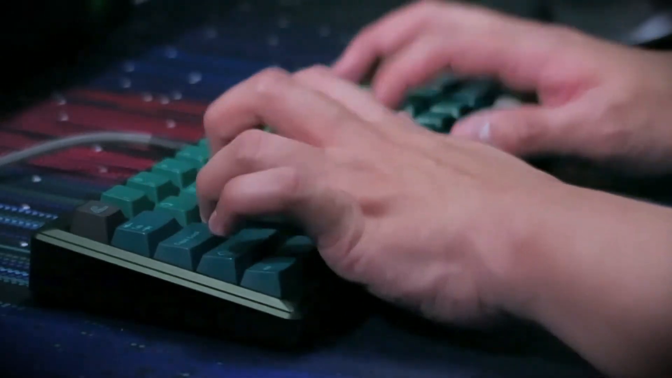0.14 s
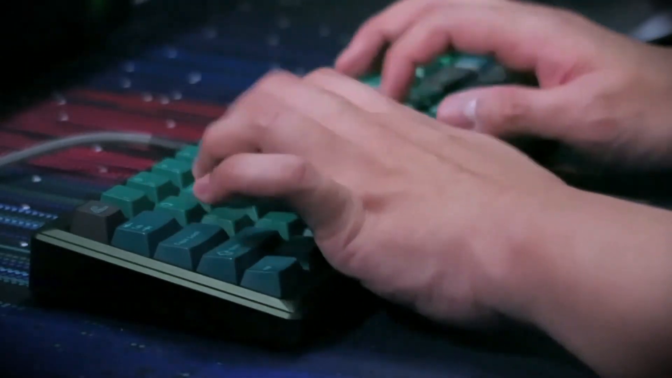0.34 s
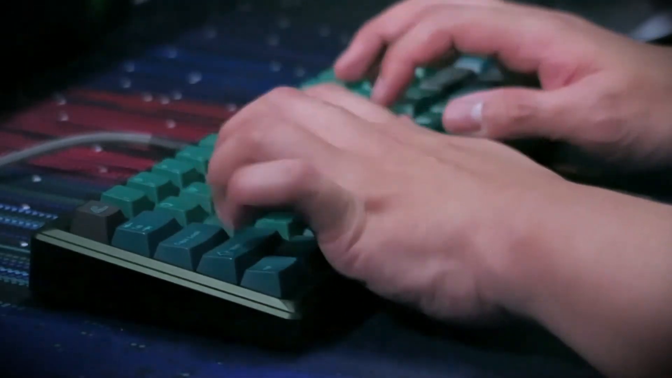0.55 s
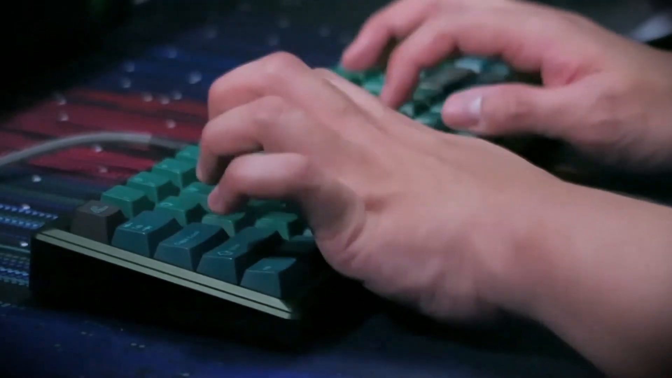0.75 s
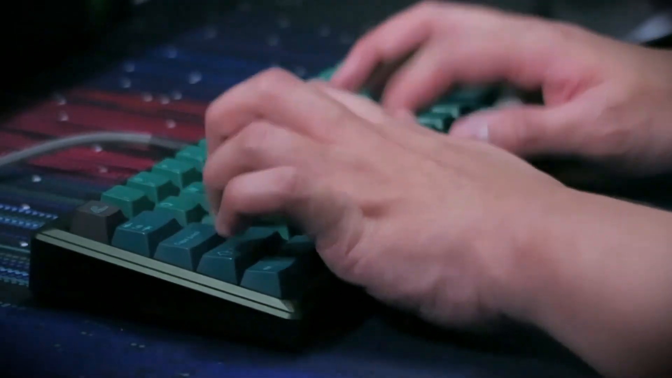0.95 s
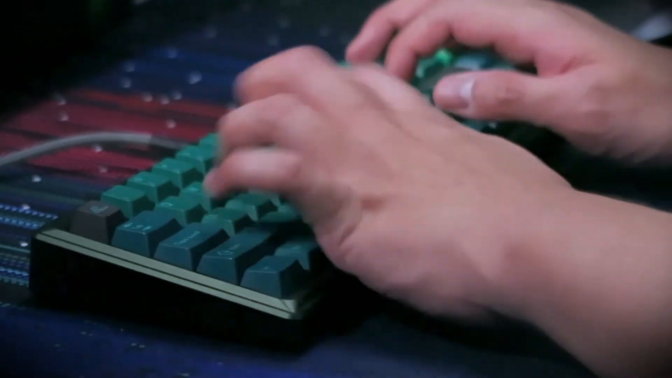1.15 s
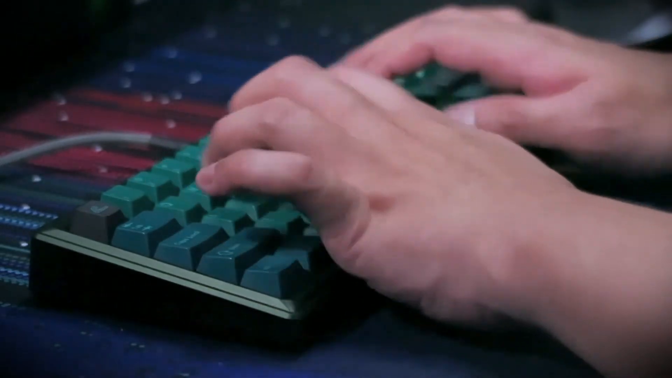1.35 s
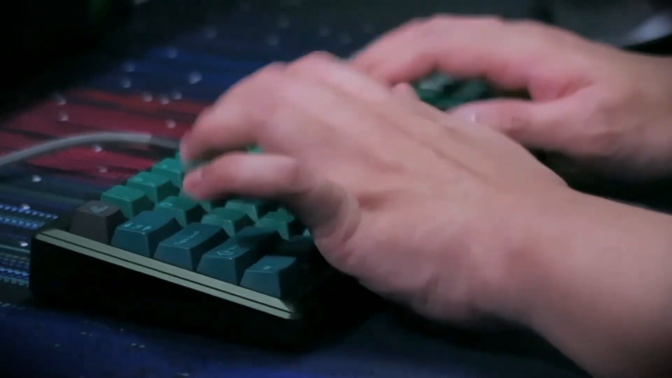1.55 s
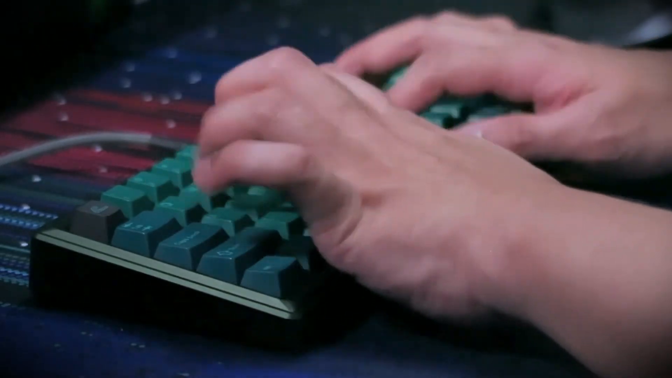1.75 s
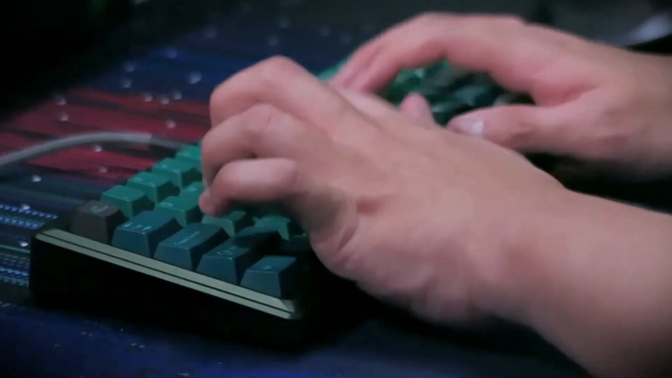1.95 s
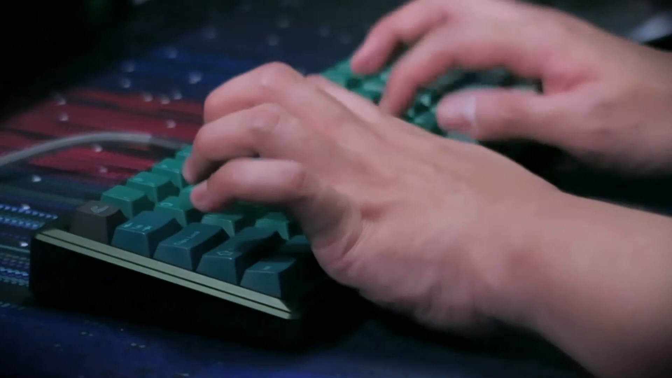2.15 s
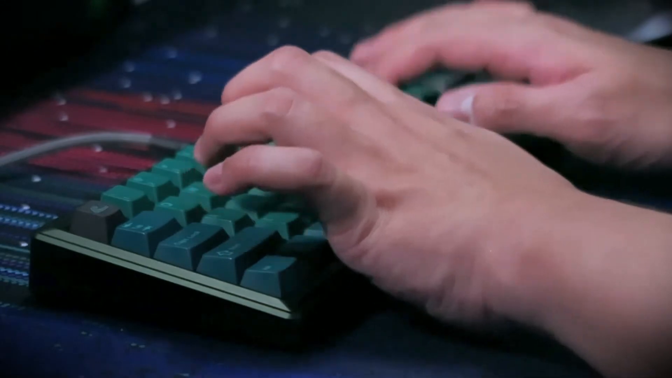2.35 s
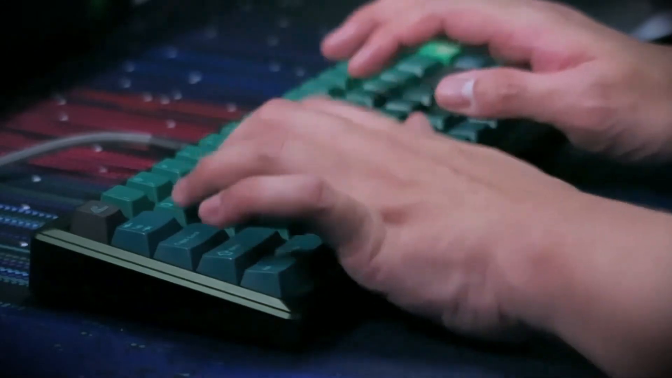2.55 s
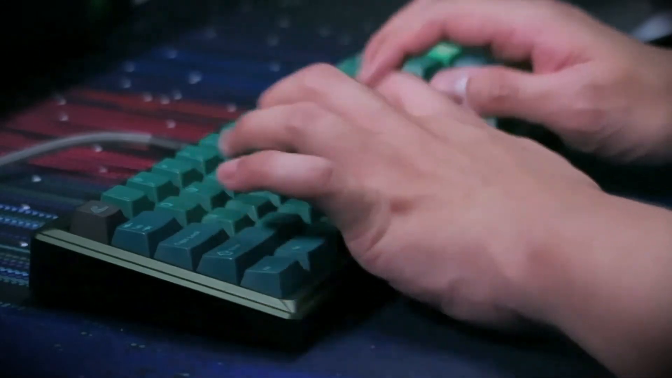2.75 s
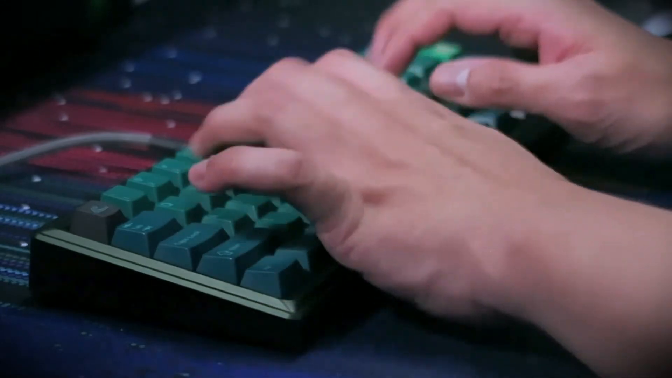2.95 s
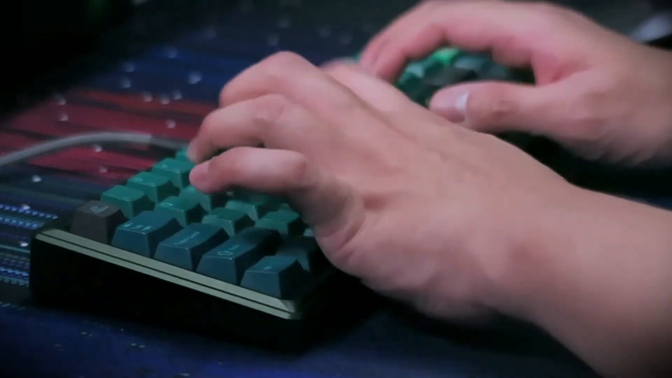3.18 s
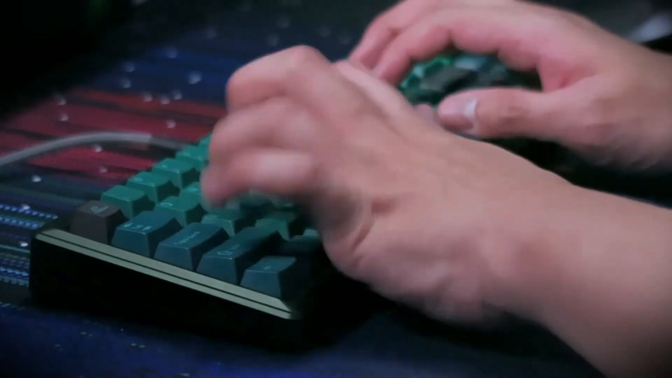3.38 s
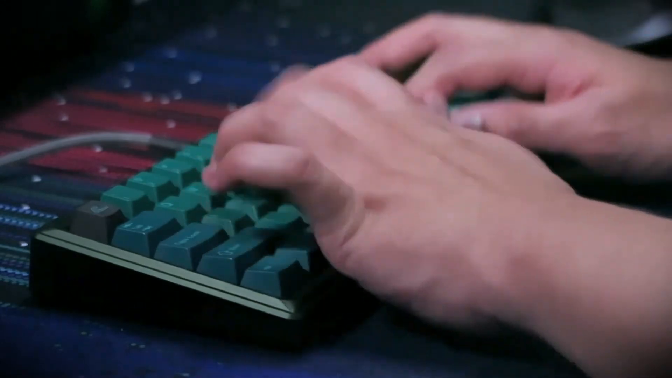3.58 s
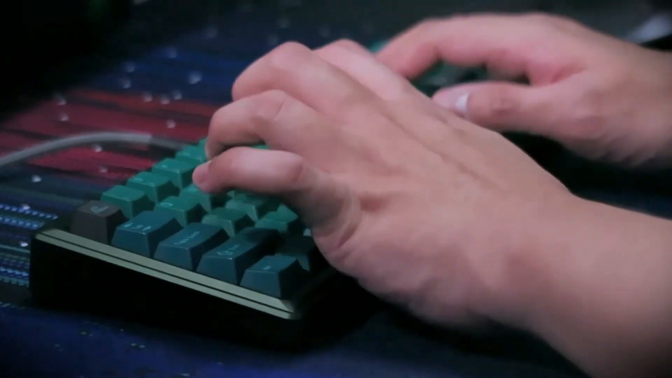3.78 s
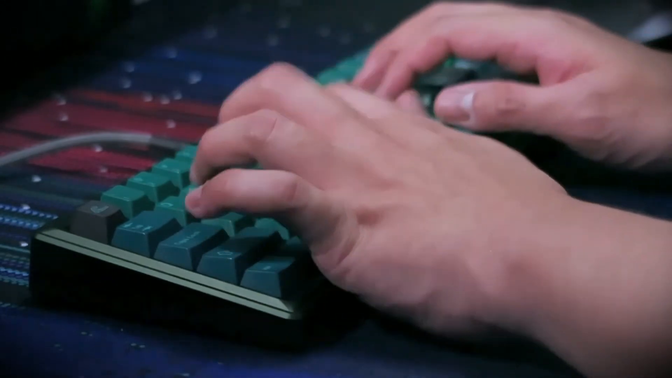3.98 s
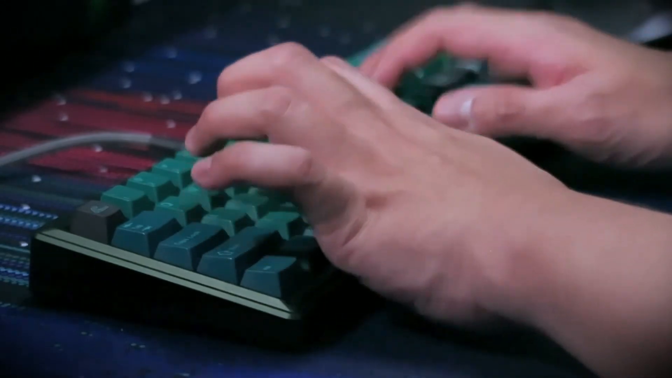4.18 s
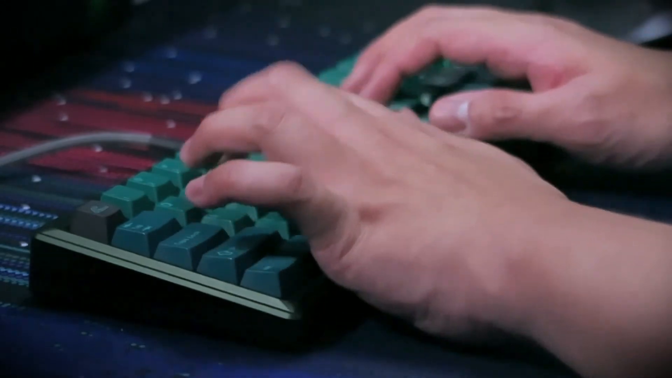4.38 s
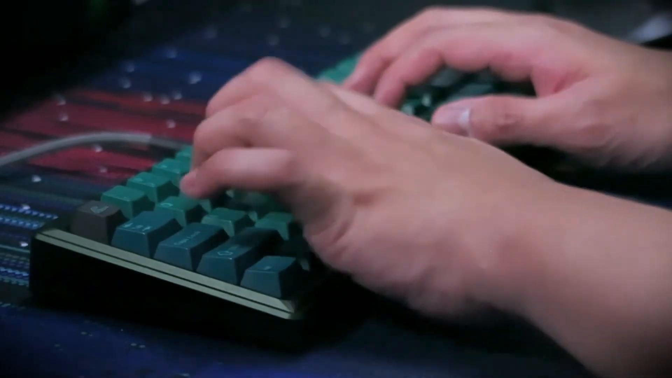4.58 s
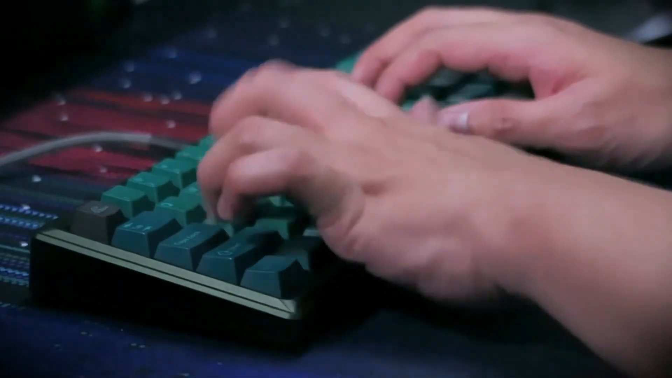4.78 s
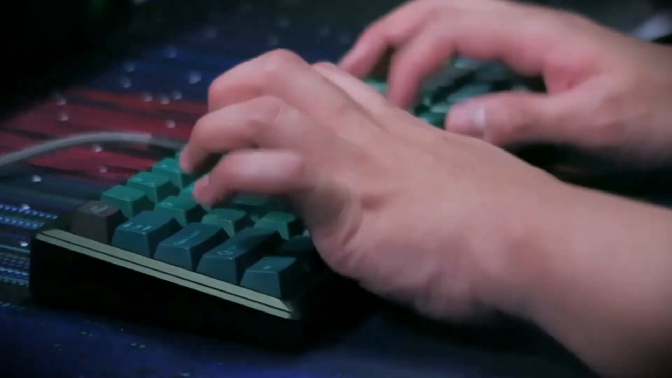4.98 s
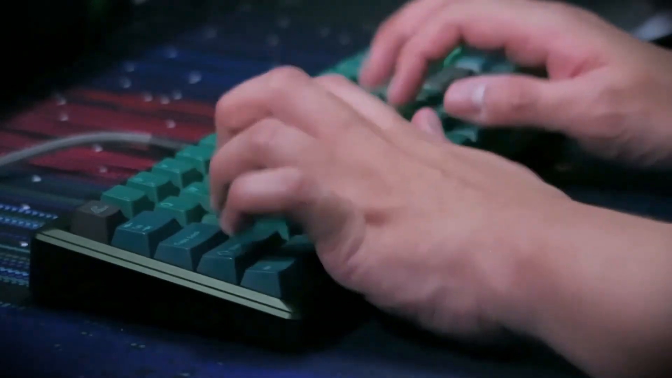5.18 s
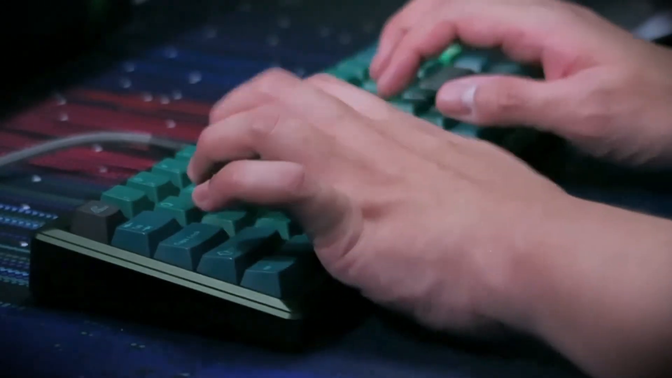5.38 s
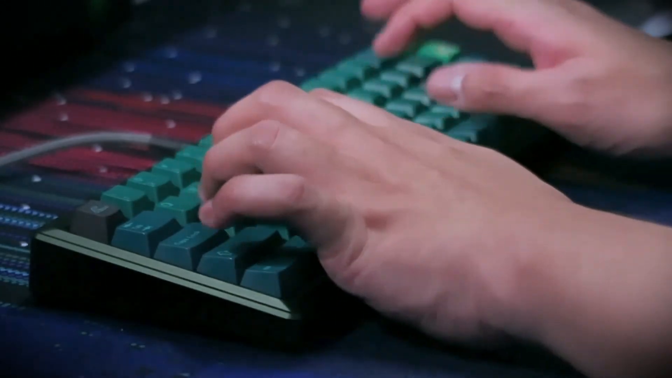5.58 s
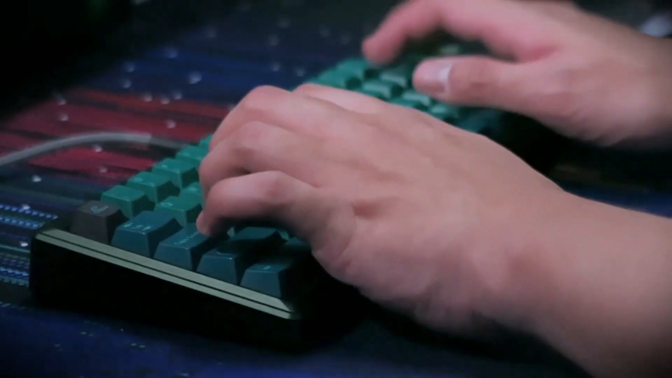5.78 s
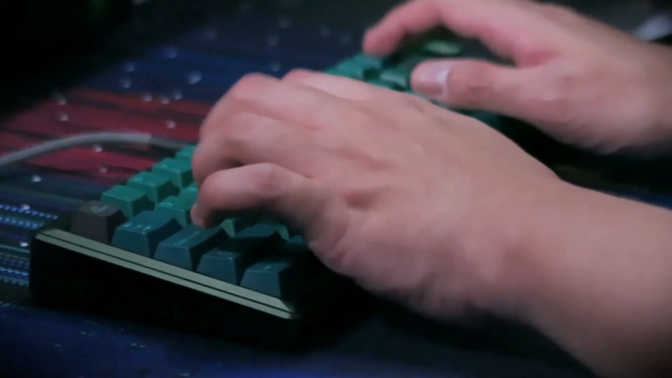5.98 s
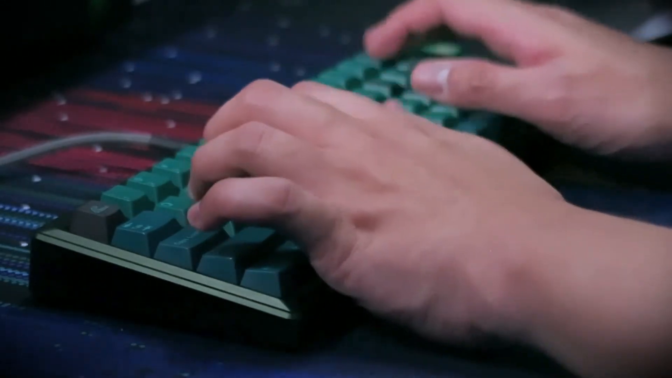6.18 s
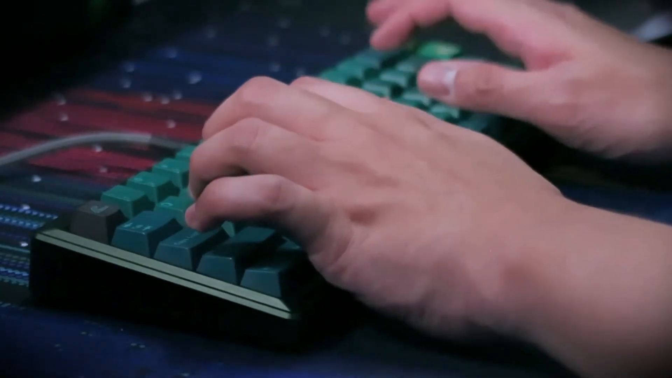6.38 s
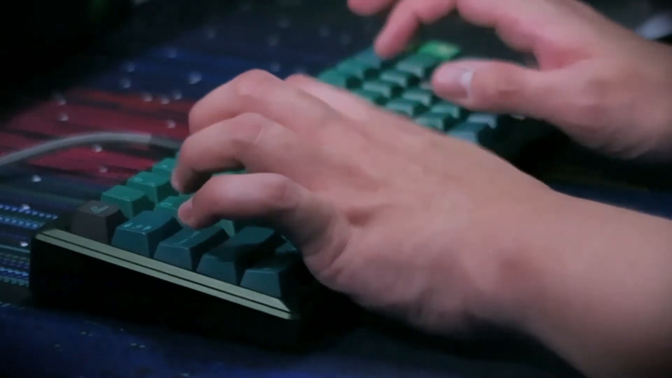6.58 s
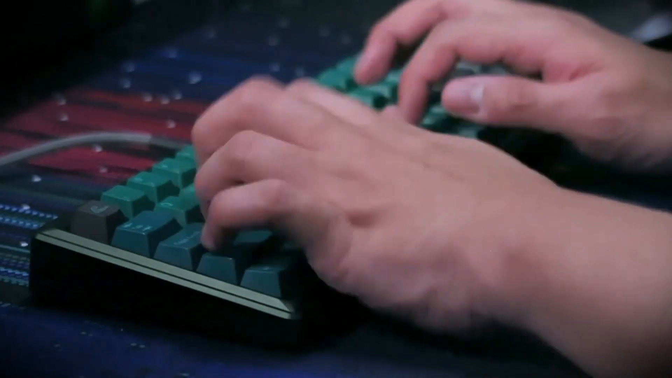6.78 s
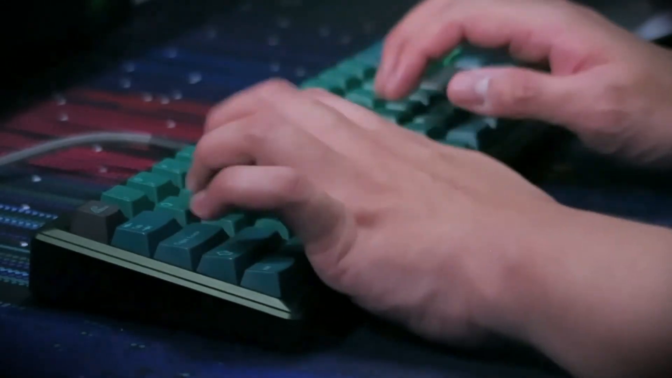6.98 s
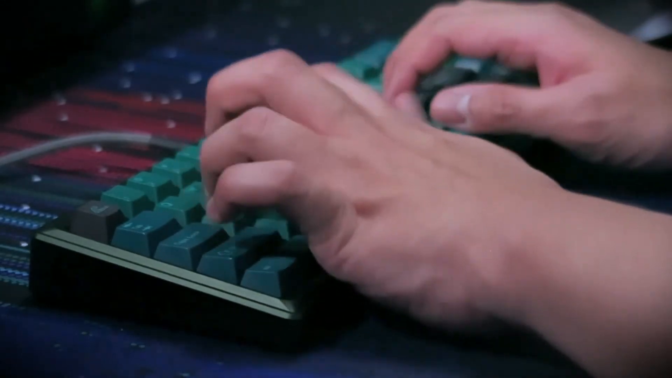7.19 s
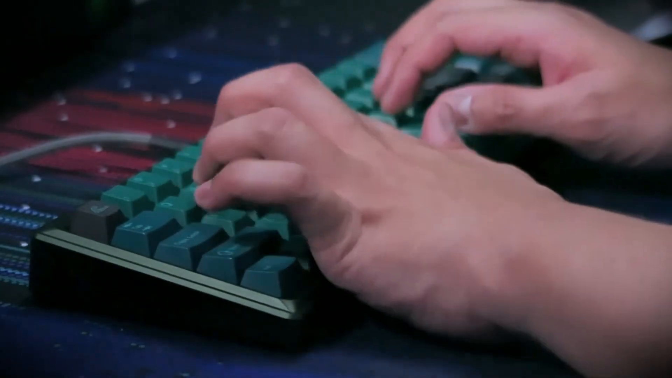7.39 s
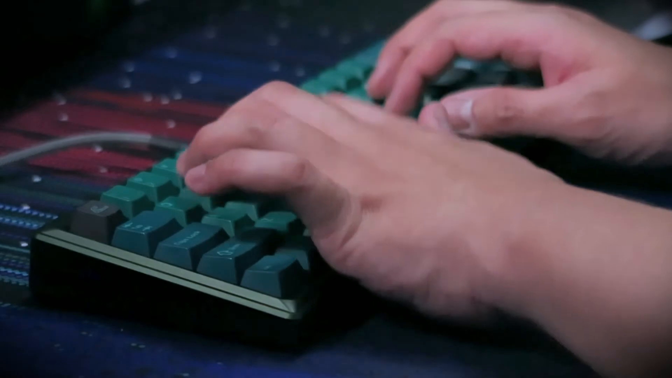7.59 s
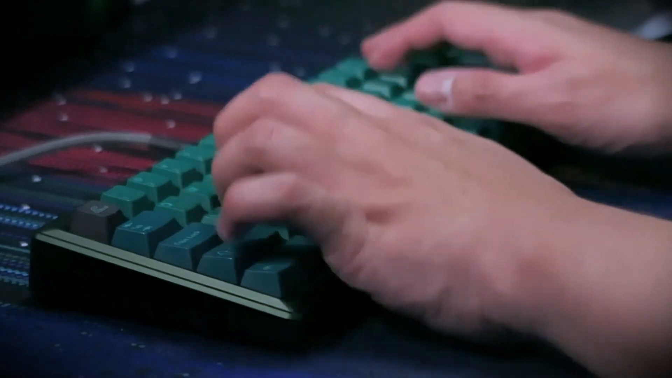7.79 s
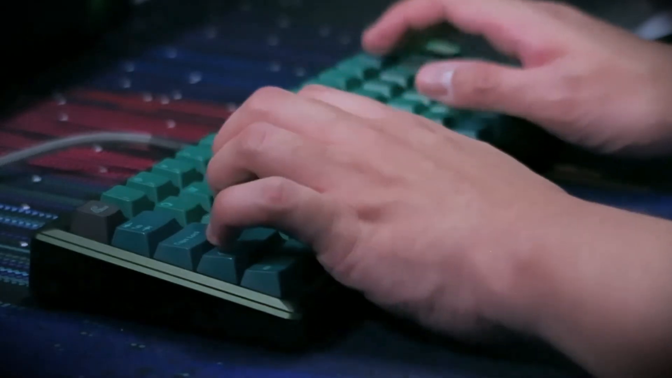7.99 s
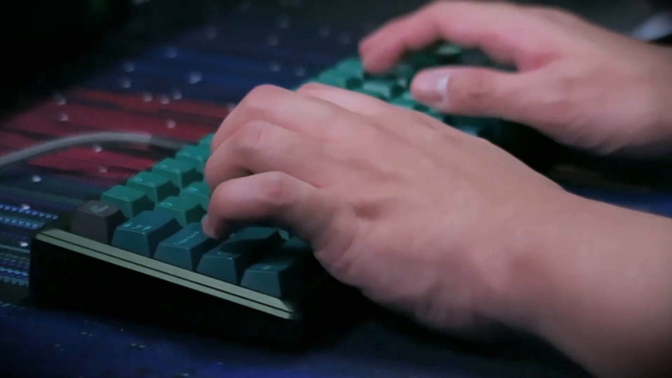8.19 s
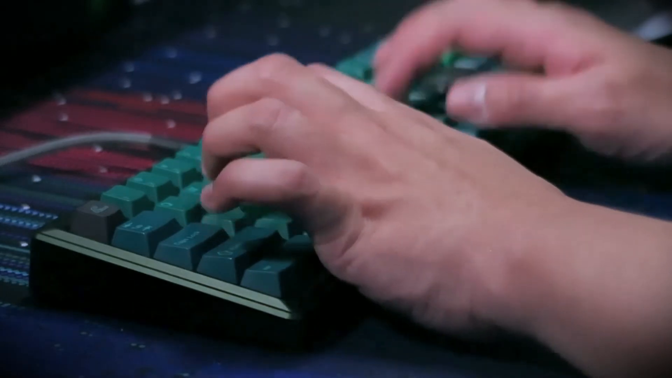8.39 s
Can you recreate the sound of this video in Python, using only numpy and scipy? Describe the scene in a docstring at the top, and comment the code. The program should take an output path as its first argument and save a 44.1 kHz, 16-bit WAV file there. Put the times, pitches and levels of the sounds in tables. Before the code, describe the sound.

Fingers type fast on a small mechanical keyboard close by, crisp clacks and hollow space-bar knocks over a faint low hum and soft room air.

```python
"""Quiet room air rushes softly throughout while two small motors hum and beat.
Over it fingers type fast on a small mechanical keyboard on a desk, close by: each key knocks as it lands or
springs back, ringing cap, plate and case after a slide that grows with force; desk and room answer briefly.
Near 1 s a low, wavering tone swells far off; later come knocks with a wide key's ring, most with a softer
knock on springing back, and near 8 s a hand brushes the desk. Knocks are noisy pushes through decaying sines."""
import sys
import numpy as np
from scipy import signal
from scipy.io import wavfile
from scipy.ndimage import uniform_filter1d

SR = 44100
rng = np.random.default_rng(int(sys.argv[2]) if len(sys.argv) > 2 else 0)


def field_ratio(decibels):
    """Amplitude ratio for a level in dB (20 dB per decade); scalars and array-likes work."""
    return 10 ** (np.asarray(decibels, dtype=float) / 20)


def wav_out(sig):
    """Save sig, one row per channel (or a flat mono array), as 16-bit PCM at SR to the path in sys.argv[1]."""
    wavfile.write(sys.argv[1], SR, np.round(np.clip(np.atleast_2d(sig).T, -1, 1) * 32767).astype(np.int16))


N = 372204
SPAN = 900  # samples of one push or ring
PLAIN_CLACK_HZ = 2620  # colour at which the clack modes stand unshifted
LETTER_BODY_DB = -22.5  # hollow body of letter and wide keys, re clack

# middle ring of a letter key, before key-to-key scatter: pitch_hz, level_db (relative), t60_s
CLACK = [(2185, -0.5, 0.009), (2530, 6, 0.0059), (3100, 0.5, 0.0083)]
# bright ring of a key, before key-to-key scatter: pitch_hz, level_db (relative), t60_s
SNAP = [(4967, -2, 0.0021), (6620, -3, 0.0012), (8580, 4.5, 0.0008), (10610, 2.5, 0.0025),
        (14500, -4, 0.002)]


def band(low_hz, high_hz, order=4):
    """Band-pass, as second-order sections."""
    return signal.butter(order, [low_hz, high_hz], "band", fs=SR, output="sos")


# the bands in which the parts of a key radiate
CLACK_BAND, SNAP_BAND = band(1702, 6600), band(3147, 13500)
BODY_BAND, WIDE_BAND = band(1000, 1469), band(1043, 7240, order=6)


def evened(x):
    """Scale to an rms of 1."""
    return x / np.sqrt(np.mean(x ** 2) + 1e-20)


def read_curve(points, hz):
    """Read a (frequency, value) curve along a log frequency axis."""
    point_hz, value = np.transpose(points)
    return np.interp(np.log(hz + 1), np.log(point_hz + 1), value)


def add(mix, start_s, sound):
    """Lay a sound into the mix, cut at the end."""
    part = mix[round(start_s * SR):][:len(sound)]
    part += sound[:len(part)]


def air():
    """Low rush of the room: shaped noise, slightly lumpy in time and frequency."""
    # spectrum of the rush: pitch_hz, level_db (relative)
    air_curve = [(40, -47.5), (105, -8.5), (350, -10.5), (950, -23), (2500, -28), (5000, -44), (16000, -38)]
    frames, hz = N // 512 + 5, np.fft.rfftfreq(2048, 1 / SR)
    real, imaginary, patches = rng.standard_normal((frames, 1025, 3)).T
    patches = uniform_filter1d(patches, size=6, axis=0)
    patches = evened(uniform_filter1d(patches, size=8, axis=1))
    level_db = read_curve(air_curve, hz)[:, None] + 2.8 * patches
    spectrum = (real + 1j * imaginary) * field_ratio(level_db)
    rush = signal.istft(spectrum, nperseg=2048, noverlap=1536)[1]
    return field_ratio(-71) * evened(rush[:N])


def hum():
    """Two motors a few hertz apart, so their multiples beat."""
    # the motors: pitch_hz, level_db (relative)
    motors = [(119.7, 0), (123., -6)]
    # first three multiples of a motor at 0 dB: level_db (rms)
    orders_db = [-80.5, -70, -85.5]
    t = np.arange(N) / SR
    out = np.zeros(N)
    for hz, motor_db in motors:
        for order, order_db in enumerate(orders_db, 1):
            sine = np.sin(2 * np.pi * (order * hz * t + rng.random()))
            out += np.sqrt(2) * field_ratio(motor_db + order_db) * sine
    return out


def ring(modes, radiates, push, place=0, spread_db=2.5, detune=0.055):
    """A push through scattered decaying modes; place (octaves) lifts and raises upper ones; rms 1 over 8 ms."""
    lean_db, stretch = 52.5, 1.8  # dB and octaves gained per octave of place and octave of mode height
    hz, level_db, t60_s = np.transpose(modes)[:, :, None]
    t = np.arange(SPAN) / SR
    height = np.log2(hz / hz[0])
    level_scatter, pitch_scatter = rng.standard_normal((2, len(modes), 1))
    level_db = level_db + lean_db * place * height + spread_db * level_scatter
    hz = hz * 2 ** (stretch * place * height) * (1 + detune * pitch_scatter)
    sines = field_ratio(level_db - 60 * t / t60_s) * np.sin(2 * np.pi * hz * t)
    out = signal.sosfilt(radiates, np.convolve(sines.sum(0), push))
    return out / np.sqrt(np.mean(out[:360] ** 2))


def slide(clack_db):
    """The stem scrapes down its housing just before a knock; soft knocks hardly do."""
    slide_db, growth = -64.5, 1.2  # at a clack of -38 dB; dB per dB harder
    t, lead_s = np.arange(SPAN) / SR, rng.uniform(0.0056, 0.013)
    push = rng.standard_normal(SPAN) * field_ratio(-14 * t / lead_s) * (t < lead_s)
    scrape = ring(CLACK, CLACK_BAND, push) + field_ratio(-4) * ring(SNAP, SNAP_BAND, push)
    level_db = slide_db + growth * (clack_db + 38) + 5 * rng.standard_normal()
    return lead_s, field_ratio(level_db) * scrape


def knock(clack_db, snap_db, clack_hz=PLAIN_CLACK_HZ, body_db=LETTER_BODY_DB, wide_key=None):
    """One sharp blow, a bounce and a dying rattle of stem against housing; a wide key rings its own modes."""
    # the hollow under a key: pitch_hz, level_db (relative), t60_s
    hollow = [(1390, 0, 0.0056)]
    # thin ring that a wide key's steadying wire adds to its snap: pitch_hz, level_db (relative), t60_s
    wire = [(13350, -2.5, .009)]
    case_detune = 0.013  # scatter of modes that belong to one fixed part
    rattle_db, softening = -23.5, 0.18  # re the blow at a clack of -33 dB; softer blows rattle relatively more
    t = np.arange(SPAN) / SR
    rattle_db -= softening * max(clack_db + 33, -20)
    push = field_ratio(rattle_db - 60 * t / 0.02) * rng.standard_normal(SPAN)
    push[0] += 1
    bounce_s = rng.uniform(0.0021, 0.008)  # the stem lands a second time, more softly
    push[round(bounce_s * SR)] += field_ratio(-23)
    # the treble starts as a spray of tiny contacts
    grit = push + field_ratio(-4 - 60 * t / 0.011) * rng.standard_normal(SPAN)
    if wide_key:
        clack = ring(wide_key, WIDE_BAND, push, spread_db=1.2, detune=case_detune)
        snap = ring(SNAP + wire, SNAP_BAND, grit, detune=case_detune)
    else:
        snap = ring(SNAP, SNAP_BAND, grit)
        clack = ring(CLACK, CLACK_BAND, push, np.log2(clack_hz / PLAIN_CLACK_HZ))
    body = field_ratio(body_db) * ring(hollow, BODY_BAND, push, detune=case_detune)
    return field_ratio(clack_db) * (clack + body + field_ratio(snap_db) * snap)


def thud(level_db):
    """The desk answers a jolt with a low, slow bump: a sine that rises softly and dies."""
    t = np.arange(6000) / SR
    hz = 95 * rng.uniform(0.79, 1.15)
    attack = np.sin(np.pi / 2 * np.minimum(t / 0.0044, 1)) ** 2
    return field_ratio(level_db - 60 * t / 0.16) * np.sin(2 * np.pi * hz * t) * attack


def knocks():
    """Every knock: start_s, clack_db, snap_db, then clack_hz, body_db and own modes where they are given."""
    # the space bar, hollow and dull: start_s, clack_db
    spaces = [(0.0363, -30.5), (0.414, -36), (0.7457, -32), (1.1143, -32), (1.7108, -38), (2.1698, -27),
              (3.206, -29.5), (4.113, -37.5), (4.8028, -46.5), (6.632, -28), (7.0379, -30)]
    # ring of the space bar: pitch_hz, level_db (relative), t60_s
    space_bar = [(1400, -15, 0.019), (2202, -2.5, 0.0081), (2480, -2, 0.0092), (3630, 1.5, 0.0013)]
    # faint ticks of keys, all at one level: start_s
    ticks = [.117, .626, 1.312, 1.501, 1.5534, 1.888, 1.921, 2.07, 2.1385, 2.378, 2.448, 2.585, 2.887,
             3.033, 3.871, 4.02, 4.2, 4.417, 4.458, 4.69, 4.736, 4.754, 4.833, 4.988, 5.0503, 6.279, 7.2827,
             7.325, 7.59, 7.6788, 8.055, 8.425]
    # louder letter-key knocks, landing or springing back:
    # start_s, clack_db, snap_db (re clack), clack_hz (colour, higher is brighter)
    letters = [(0.1373, -37, -14, 2070), (0.2272, -33.5, -4, 2460), (0.3143, -30.5, -4.5, 2660),
               (0.4441, -33, -10, 2140), (0.5435, -29.5, -3.5, 2520), (0.6124, -38, -12.5, 2250),
               (0.66, -31, -0.5, 2800), (0.8531, -31.5, -10, 2920), (0.9178, -30.5, -11.5, 2120),
               (1.006, -40.5, -12.5, 2250), (1.0164, -36.5, 0.5, 2760), (1.2366, -34, -6.5, 2560),
               (1.3293, -29.5, -6, 2600), (1.4706, -34.5, -11.5, 2620), (1.6481, -33.5, -8, 2530),
               (1.7708, -31.5, -1.5, 2350), (1.8377, -27.5, -11.5, 2250), (1.878, -31.5, -9.5, 2310),
               (2.042, -36.5, -9.5, 2760), (2.2505, -32, -7, 2700), (2.5606, -40, -9, 2530),
               (2.683, -34.5, -10, 2690), (2.7395, -29.5, -7.5, 2540), (2.8507, -36, -9.5, 3000),
               (2.9002, -34, -12.5, 2700), (3.0475, -38.5, -6.5, 2730), (3.1392, -33, -8.5, 2600),
               (3.307, -32.5, -8.5, 2740), (3.378, -39, -5, 2380), (3.4685, -31, -9, 2200),
               (3.5464, -39, -14.5, 2400), (3.5732, -32, 0.0, 2600), (3.636, -31.5, -5, 2700),
               (3.7811, -31.5, -4, 2750), (3.9093, -33, -2.5, 2750), (4.2288, -29.5, -5.5, 2660),
               (4.3026, -28, -9.5, 2800), (4.576, -36.5, -7, 2770), (4.636, -40, -13, 2350),
               (4.7748, -35, -10, 2240), (4.856, -38.5, -17, 2190), (4.9005, -27.5, -9.5, 2640),
               (5.063, -34.5, -7.5, 3070), (5.1511, -26.5, -12.5, 2320), (5.2676, -36, -9, 2860),
               (5.325, -30.5, -10, 2560), (6.731, -31.5, -6.5, 3100), (6.8169, -26.5, -11.5, 2340),
               (6.9019, -33.5, -7, 2880), (6.9743, -37, -10.5, 2530), (7.025, -41.5, -7.5, 2480),
               (7.1567, -36.5, -5.5, 2800), (7.519, -37, -11, 2310), (8.432, -34, -4, 2830)]
    # soft knocks, mostly letter keys springing back: start_s, clack_db
    returns = [(0.3818, -43.5), (0.518, -45.5), (0.676, -42), (0.7218, -42), (1.0845, -45.5),
               (1.3829, -45.5), (1.5683, -41), (1.9602, -38.5), (2.096, -48.5), (2.126, -44.5),
               (2.1489, -41), (2.3098, -42.5), (2.3936, -39), (2.468, -46), (2.4935, -50.5),
               (2.5153, -47.5), (2.6416, -41), (2.925, -48.5), (2.9636, -39.5), (3.0876, -44.5),
               (3.121, -42), (3.708, -41.5), (3.7337, -46), (3.8559, -47), (3.9643, -42.5), (4.0341, -40),
               (4.1003, -42), (4.355, -43), (4.4353, -43.5), (4.476, -37.5), (4.511, -42.5), (4.598, -41.5),
               (4.9644, -43.5), (5.2214, -43), (5.3976, -45), (6.1804, -43.5), (6.883, -42.5), (6.987, -45),
               (7.1435, -42.5), (7.668, -45.5)]
    # soft dull knocks, perhaps fingertips landing on a cap: start_s, clack_db
    touches = [(1.208, -50), (1.928, -44.5), (2.459, -47), (2.8112, -43), (4.7012, -43), (5.1334, -46.5),
               (5.337, -47), (5.495, -56), (6.1112, -45.5), (6.798, -47.5), (7.185, -45), (7.623, -46.5),
               (8.0958, -56)]
    # knocks with a wide key's ring, most with a softer knock on springing back:
    # start_s, clack_db, back_after_s, back_db (clack of the second knock)
    wide_knocks = [(5.6959, -31.5, 0.058, -56), (5.8269, -37, 0.064, -51), (5.9587, -37.5, 0.068, -57.5),
                   (6.122, -41.5, 0.047, -60), (6.1576, -42.5, 0.065, -53), (6.295, -43, 0.04, -80.5),
                   (7.8094, -34.5, .0578, -55.5), (7.9406, -42.5, 0.068, -57.5),
                   (8.1878, -41.5, 0.049, -73)]
    # ring of that wide key: pitch_hz, level_db (relative), t60_s
    wide_ring = [(1250, -7.5, 0.02), (2200, 4, 0.0086), (3180, 8.5, 0.0032), (4440, -18, 0.027),
                 (5970, -2.5, 0.0023)]

    soft_body_db = -19  # re clack, for returns, touches and ticks
    wire_lead_s, wire_db = 0.011, -21  # the steadying wire ticks just before the bar lands; dB re its clack
    plain = PLAIN_CLACK_HZ, LETTER_BODY_DB
    soft = PLAIN_CLACK_HZ, soft_body_db

    rows = list(letters)
    for s, db in spaces:
        rows.append((s, db, -14.5, *plain, space_bar))
        rows.append((s - wire_lead_s, db + wire_db, -9, *plain, space_bar))
    rows += [(s, -56, -11.5, *soft) for s in ticks]
    for s, db in returns:
        snap_scatter, colour_scatter = rng.standard_normal(2)
        clack_hz = PLAIN_CLACK_HZ * (1 + 0.073 * colour_scatter)
        rows.append((s, db, -11 + 4 * snap_scatter, clack_hz, soft_body_db))
    rows += [(s, db, -20.5, *soft) for s, db in touches]
    for s, db, back_after_s, back_db in wide_knocks:
        rows.append((s, db, -12, *plain, wide_ring))
        # in the second knock the hollow body is as loud as the clack
        rows.append((s + back_after_s, back_db, -12, PLAIN_CLACK_HZ, 0, wide_ring))
    return rows


def keys():
    """Knocks and slides; apart from them the cracks that fill the room, and the thuds of the desk."""
    # a wrist or palm jolts the desk: start_s, level_db (before the desk's band-pass)
    thumps = [(0.909, -68), (1.33, -54), (3.58, -61), (3.785, -58), (5.698, -54)]
    crack_t60_s = 0.0076  # the walls return the first crack of a blow more than its close ring
    near, cracks, desk = np.zeros((3, N))
    for start_s, clack_db, snap_db, *colour in knocks():
        blow = knock(clack_db, snap_db, *colour)
        add(near, start_s, blow)
        add(cracks, start_s, blow * field_ratio(-60 * np.arange(len(blow)) / SR / crack_t60_s))
        lead_s, scrape = slide(clack_db)
        add(near, start_s - lead_s, scrape)
        add(desk, start_s, thud(clack_db - 34 + 3 * rng.standard_normal()))
    for start_s, level_db in thumps:
        add(desk, start_s, thud(level_db))
    return near, cracks, signal.sosfilt(band(48, 250, order=2), desk)


def room(x):
    """Sparse taps dying band by band, in uneven bursts; three tails take turns."""
    # decay of the room: pitch_hz, t60_s
    decay = [(1000, 0.6), (2300, 0.2), (5000, 0.22), (12000, 0.2)]
    taps = np.zeros((3, SR // 2))
    # one tap of random sign in every 20 samples
    at = np.arange(180, SR // 2 - 20, 20) + rng.integers(0, 20, (3, (SR // 2 - 181) // 20))
    np.put_along_axis(taps, at, rng.choice([-1., 1.], at.shape), 1)
    hz, t, spectrum = signal.stft(taps, SR, nperseg=256)
    bursts_db = 3.6 * rng.standard_normal((3, len(t)))[:, None]
    fade_db = -60 * t / read_curve(decay, hz)[:, None]
    tails = signal.istft(spectrum * field_ratio(bursts_db + fade_db), SR, nperseg=256)[1]
    tails /= np.linalg.norm(tails[0])
    phase = 7.3 * np.arange(N) / SR + np.arange(3)[:, None] / 3
    turns = np.cos(np.pi * phase) * np.sqrt(2 / 3)  # the three powers always sum to 1
    return signal.fftconvolve(x * turns, tails, axes=1)[:, :N].sum(0)


def moan():
    """A low, wavering tone far off: narrow noise under one slow swell."""
    middle_s, half_s, hz, level_db = 0.95, 0.14, 330, -69.5
    swell = np.exp(-((np.arange(N) / SR - middle_s) / half_s) ** 2)
    tone = signal.sosfilt(band(hz - 20, hz + 20, order=1), rng.standard_normal(N))
    return field_ratio(level_db) * swell * evened(tone)


def scuff():
    """A hand brushes the desk: a short, dull rub of sparse noise grains, fading as it goes."""
    start_s, level_db, low_hz, high_hz = 8.074, -51.5, 760, 1400
    t, out = np.arange(4000) / SR, np.zeros(N)
    grains = rng.standard_normal(len(t)) * (rng.random(len(t)) < 1500 / SR)  # about 1500 a second
    rub = evened(signal.sosfilt(band(low_hz, high_hz, order=1), grains))
    add(out, start_s, field_ratio(level_db - 60 * t / 0.09) * rub)
    return out


def scene():
    """Air, hum, keys, desk, moan and scuff; the room answers the cracks and the scuff."""
    near, cracks, desk = keys()
    rub = scuff()
    echoes = field_ratio(-12) * room(cracks + rub)
    return (air() + hum() + near + desk + echoes + moan() + rub)[None]


def band_limit(x):
    """A steep low-pass at the top of the band."""
    return signal.sosfilt(signal.butter(12, 17140, fs=SR, output="sos"), x)


def record(dry):
    """The finished mix goes out with nothing else added."""
    return band_limit(dry)


dry = scene()
out = record(dry)
wav_out(out)
```